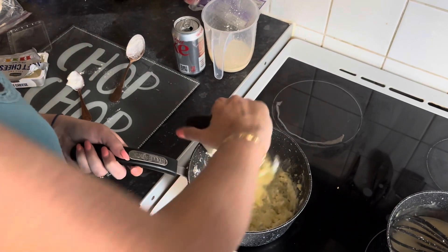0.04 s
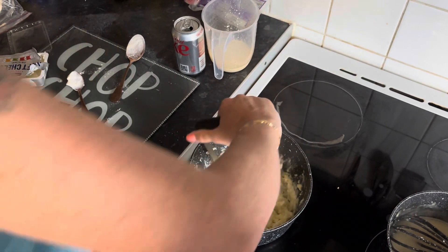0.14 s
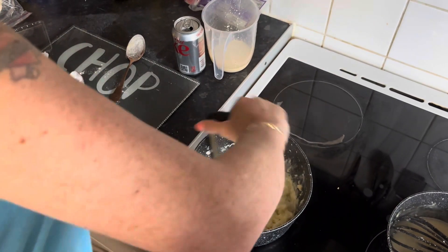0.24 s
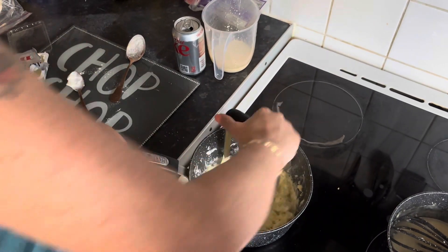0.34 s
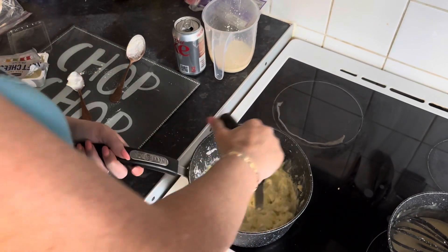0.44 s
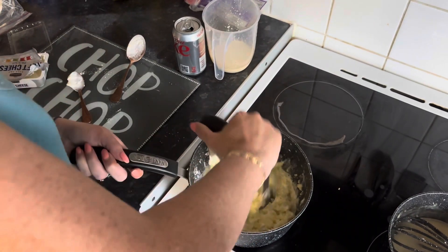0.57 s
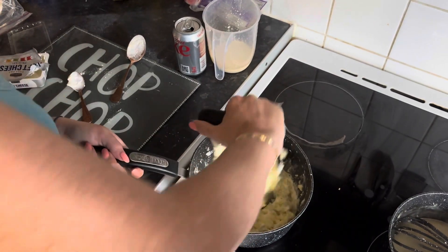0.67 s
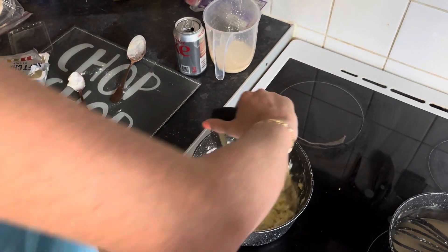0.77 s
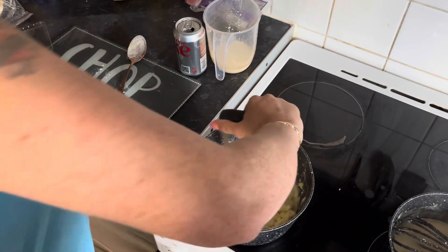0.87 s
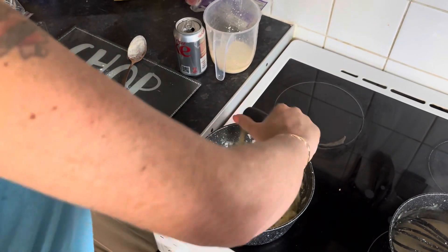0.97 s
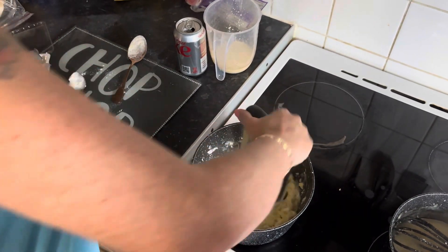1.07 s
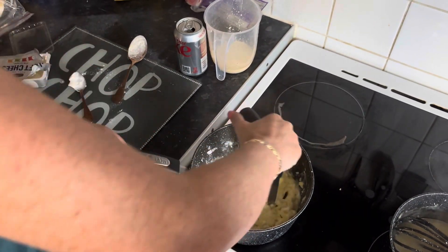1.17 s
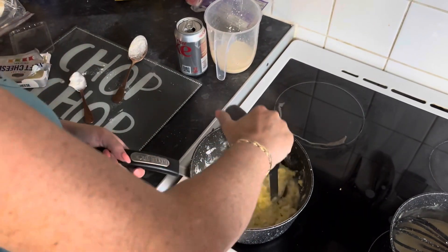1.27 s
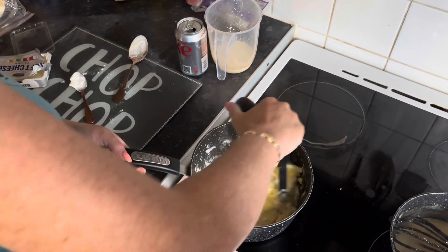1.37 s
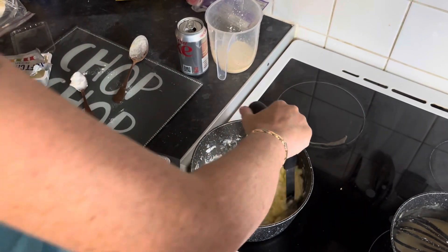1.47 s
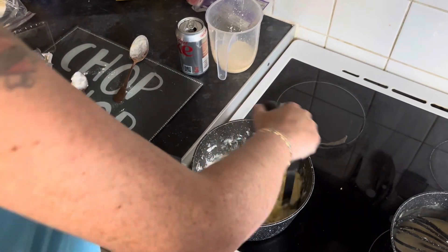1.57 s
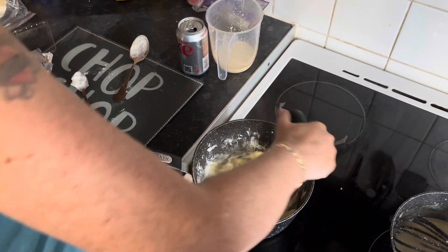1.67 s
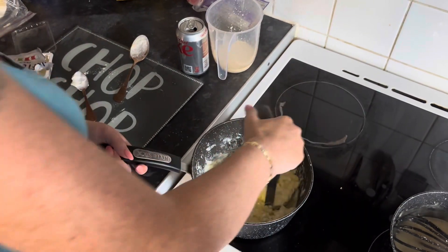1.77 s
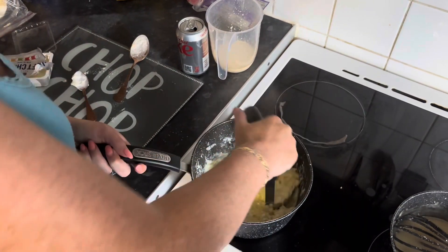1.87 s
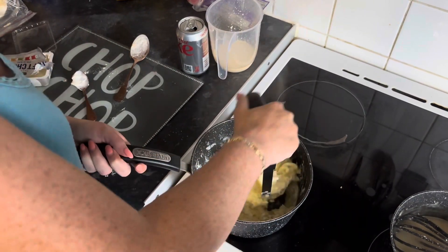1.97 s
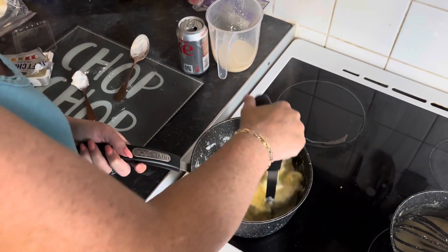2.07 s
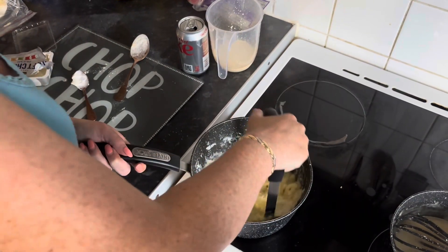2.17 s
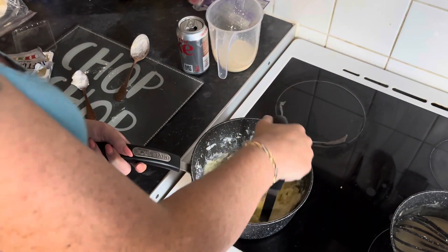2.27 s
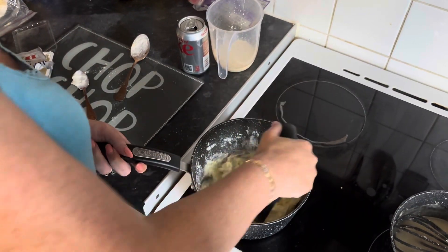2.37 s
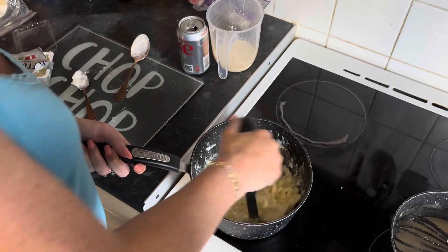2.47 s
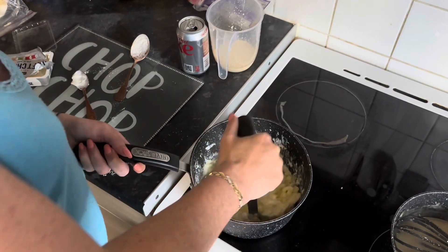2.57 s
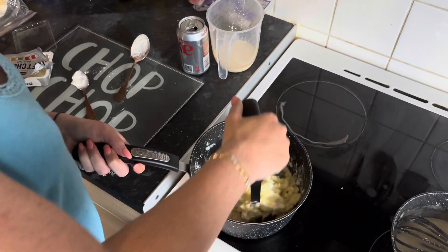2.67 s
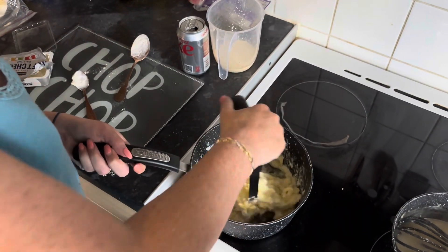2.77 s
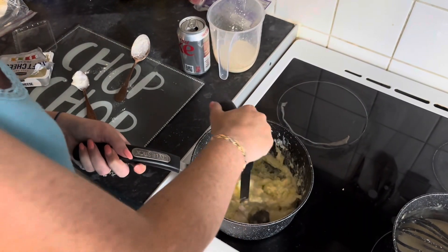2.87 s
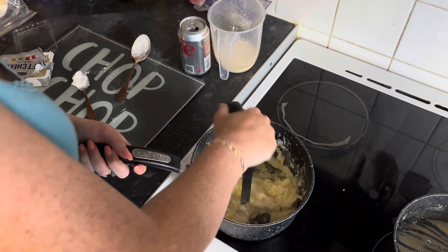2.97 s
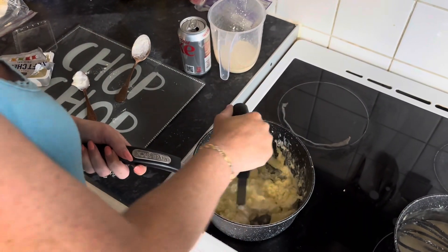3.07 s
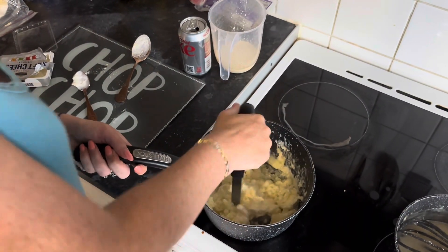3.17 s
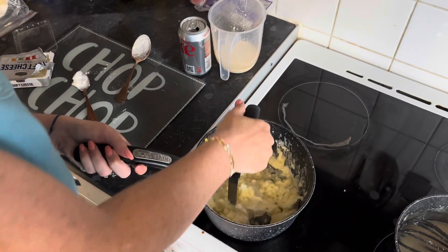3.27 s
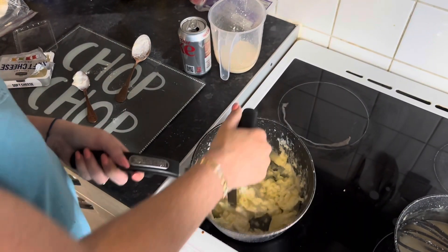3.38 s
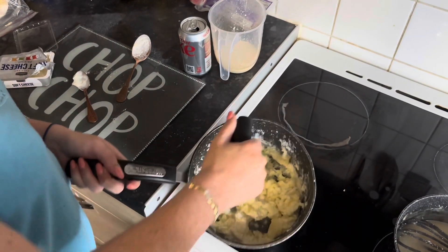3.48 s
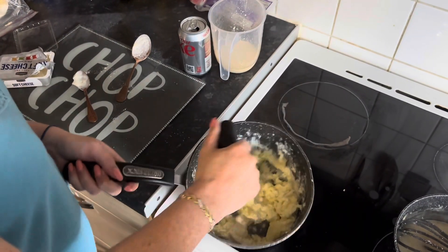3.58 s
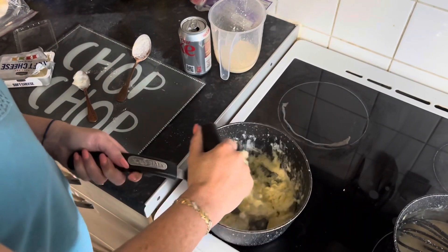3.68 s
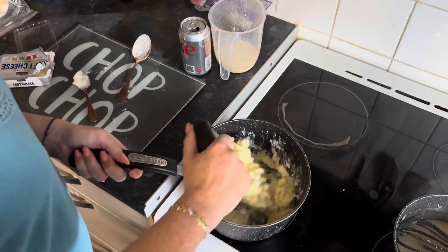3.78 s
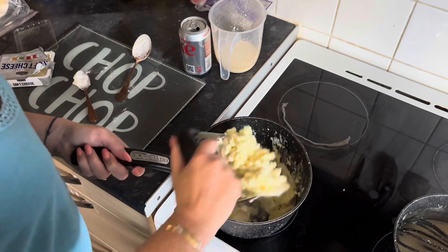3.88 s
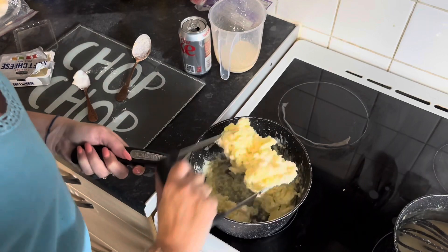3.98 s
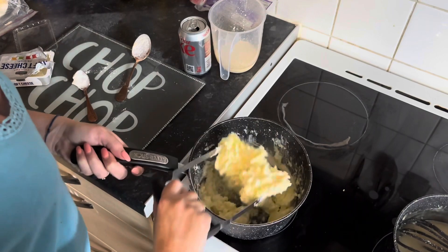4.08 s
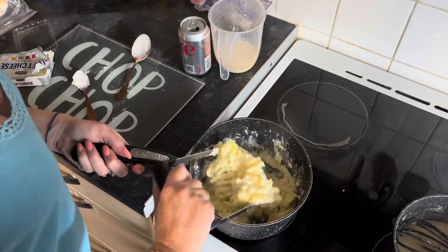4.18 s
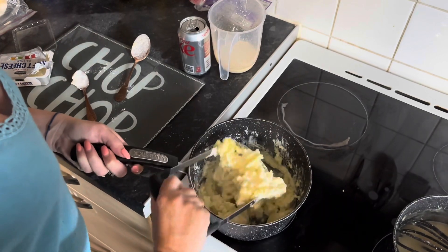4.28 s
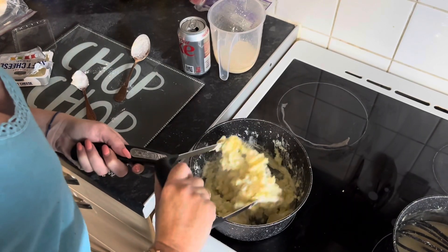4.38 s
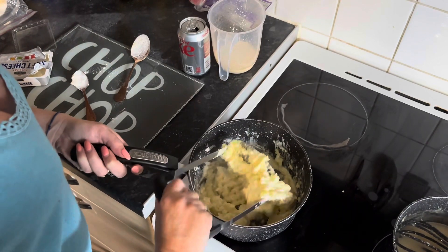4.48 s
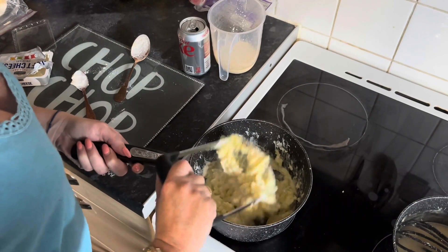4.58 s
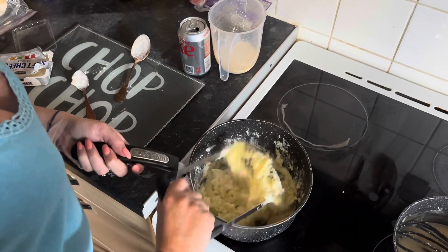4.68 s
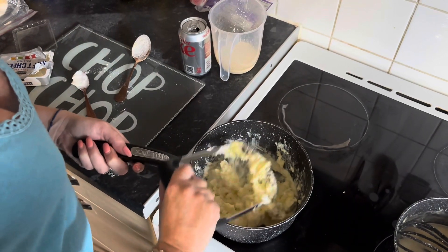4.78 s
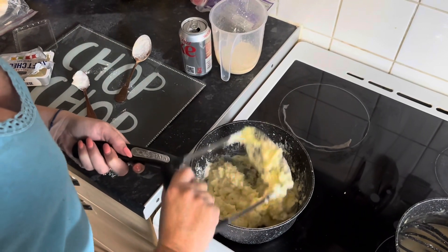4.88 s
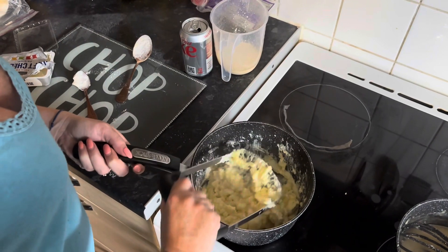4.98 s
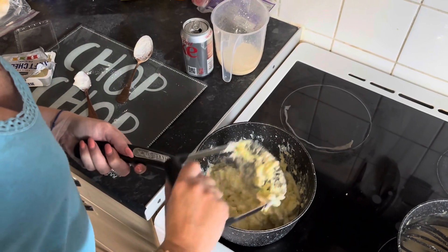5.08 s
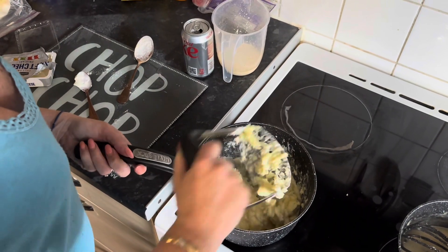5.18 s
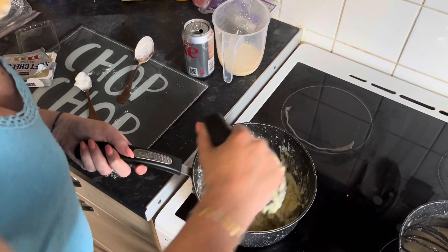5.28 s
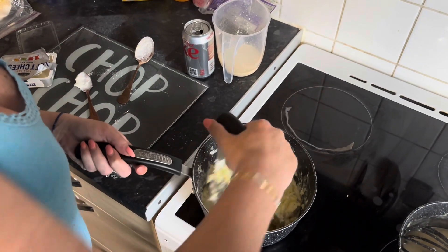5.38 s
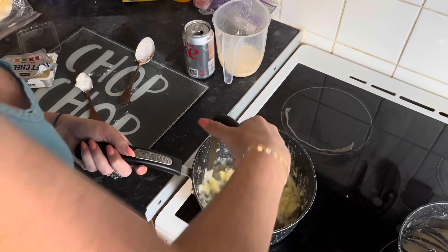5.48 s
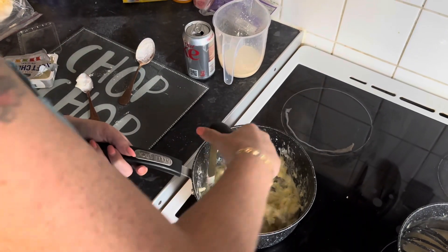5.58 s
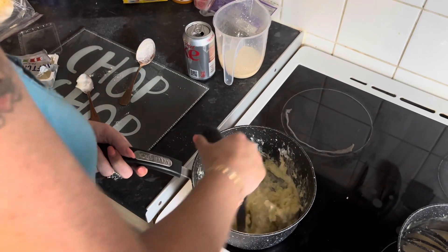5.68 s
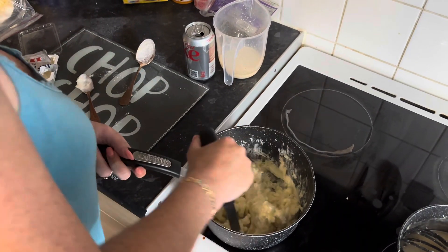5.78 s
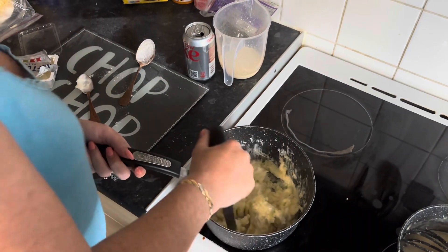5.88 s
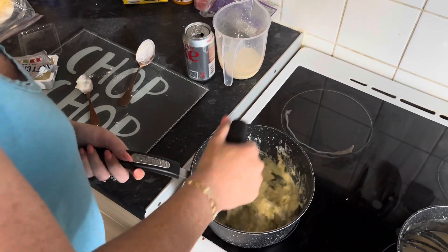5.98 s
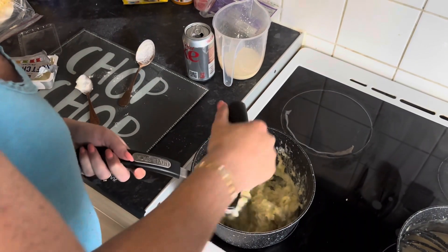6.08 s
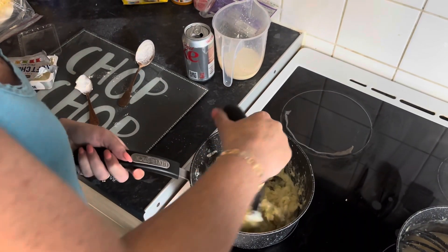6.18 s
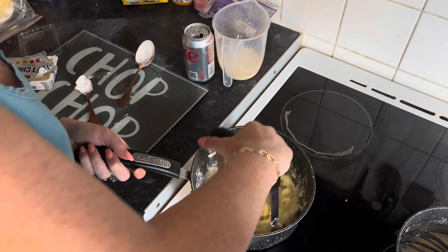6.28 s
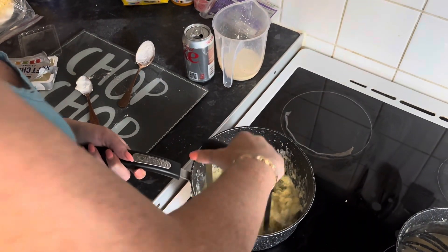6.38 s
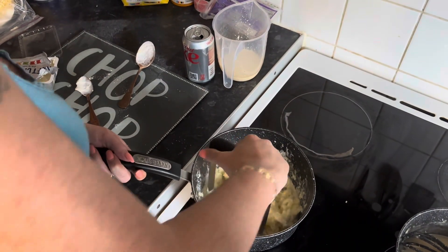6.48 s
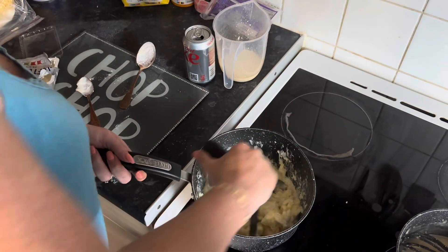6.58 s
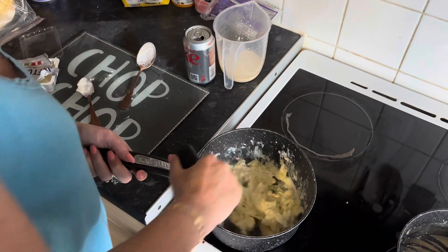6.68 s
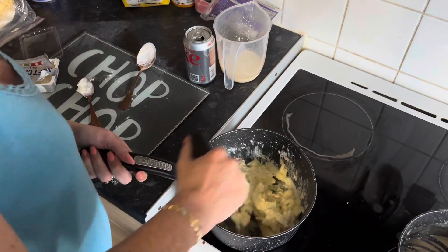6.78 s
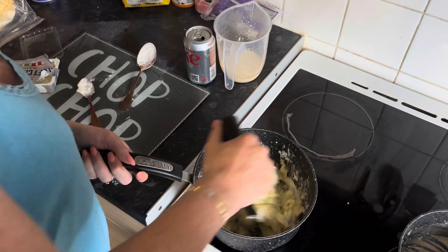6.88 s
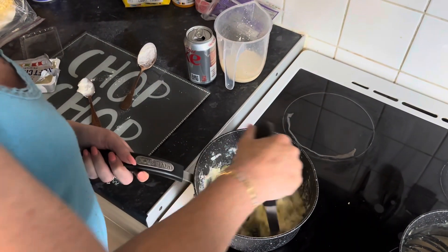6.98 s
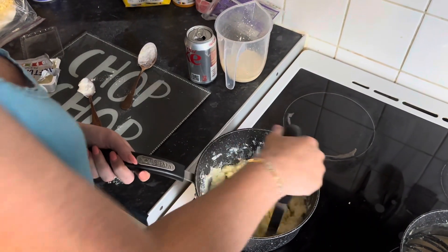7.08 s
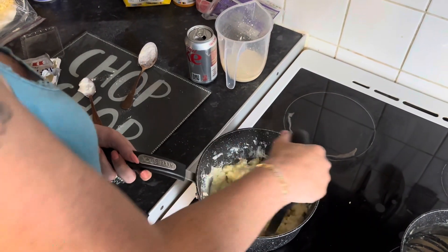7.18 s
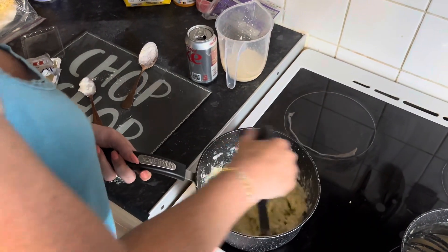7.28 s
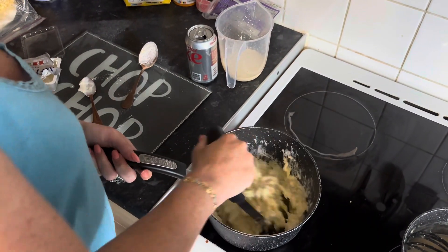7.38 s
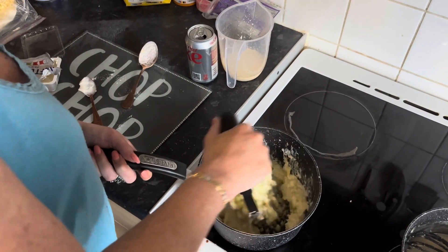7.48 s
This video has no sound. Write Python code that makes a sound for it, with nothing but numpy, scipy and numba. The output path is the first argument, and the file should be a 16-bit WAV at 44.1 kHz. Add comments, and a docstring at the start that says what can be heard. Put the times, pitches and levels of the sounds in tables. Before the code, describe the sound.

Close, uneven potato mashing: dull pan knocks, gritty metal scraping, a burst of hard rim clanks midway, then lighter squelchy working.

```python
"""Clanks, scrapes, crunches and small wet pops: a steel masher works through potatoes in a saucepan.
Place: a glass hob in a small tiled kitchen; a phone's two microphone ports hear it at an arm's length.
Blows push damped modes of pan, wires and hob, with a dull knock and a late cooker boom; gritty noise
scrapes and rubs through the same modes, broadened; air pockets ring for a few cycles.
Eight linked delays answer as tiles, over the faint shaped noise of the room's air."""
import sys
import numpy as np
from scipy import signal
from scipy.fft import rfft, irfft
from scipy.io import wavfile
from scipy.ndimage import uniform_filter1d
from numba import njit

SR = 44100
rng = np.random.default_rng(int(sys.argv[2]) if len(sys.argv) > 2 else 0)


def store_pcm(level_fs):
    """Save levels as 16-bit WAV."""
    pcm = np.round(np.clip(level_fs, -1, 1) * 32767).astype(np.int16)
    wavfile.write(sys.argv[1], SR, np.atleast_2d(pcm).T)


N = 332514  # samples

# Levels in the tables are those ahead of the microphone.
# Spectrum of the kitchen air: (frequency [Hz], relative density [dB])
AIR = [(15, -46), (25, -14), (80, 5.5), (1060, -23.5), (1880, -39.5), (6730, -42), (8370, -27),
       (10700, -33.5), (11600, -36.5), (15200, -34.5), (16500, -52)]
# Echo paths between the tiles: (delay [ms])
KITCHEN_PATHS_MS = [5.3, 9.1, 13.7, 19.9, 26.3, 33.1, 41.9, 50.3]
# Modes of the hob: (frequency [Hz], width [Hz], level [dB])
HOB_MODES = [(112.4, 16, 0), (165.4, 41, -2.5), (166.7, 19, 4.5), (215.7, 13, -12), (260, 15, 3.5),
             (366, 24, -30.5)]
# Modes of the saucepan: (frequency [Hz], width [Hz], level [dB])
PAN_MODES = [(424.6, 44, 6), (468.5, 45, 10.5), (525.8, 41.4, 6), (620, 70, 3), (736.7, 64, 3.5),
             (870, 60, 0.5), (1010, 74, 0), (1210, 139, 2), (1470, 148, 1.5), (1704, 140, 1.5),
             (1900, 230, 0), (2053, 180, -3.5), (2320, 130, -4.5), (2510, 390, -8.5)]
# Modes of the masher wires: (frequency [Hz], width [Hz], level [dB])
WIRE_MODES = [(2700, 720, -7.5), (3130, 260, 0.5), (3445, 160, 1), (3555, 98, 4), (3860, 440, -5),
              (4410, 330, 2), (5140, 690, -5), (5960, 210, -4), (6980, 1150, -12.5), (7930, 320, -2.5),
              (9450, 1020, -7), (9580, 390, -15.5), (14400, 1300, -41)]
# The pan shifts on the glass:
# (middle time [s], length [ms], hob level at the height of the move [dB rms], cooker over hob [dB])
SHUFFLES = [(0.018, 71, -41, -16.5), (.35, 200, -56.5, 5), (1.0, 200, -54.5, 8.5), (1.45, 130, -48, -10),
            (1.68, 240, -43, -2), (2.5, 130, -63, 14), (3.04, 110, -51, -3.5), (3.821, 440, -44.5, -4.5),
            (5.72, 190, -46, -1), (6.62, 230, -52.5, 8.5), (6.78, 220, -54, 5), (6.95, 245, -67.5, 21),
            (7.141, 39, -47.5, 1), (7.251, 200, -57.5, 10.5)]
# The masher works through the mash between blows:
# (time [s], wires dragging on the pan [dB rms], their hiss [dB rms], pan rubbing on the hob [dB rms])
DRAG = [(0.0, -40.5, -62, -65), (0.38, -62, -67.5, -55), (0.68, -70, -67.5, -79), (0.842, -50, -63, -57),
        (1.16, -72.5, -72.5, -56.5), (1.53, -47.5, -62, -53), (1.95, -76, -79, -60.5),
        (2.3, -63.5, -64.5, -77), (2.75, -75.5, -75.5, -68), (3.0, -59, -69, -57), (3.59, -64.5, -72, -63),
        (3.98, -69.5, -76.5, -54.5), (4.89, -57.5, -59.5, -46.5), (5.2, -72, -78, -49),
        (5.42, -71.5, -99.5, -64), (5.56, -61, -56, -52), (6.07, -70, -78, -72), (6.57, -59.5, -62.5, -57),
        (6.91, -79.5, -77, -85), (7.14, -58.5, -62.5, -57.5), (7.54, -73.5, -85.5, -76)]
# Wires sweep along the pan, levels before the swell (a sweep can start no earlier than 0 s):
# (middle time [s], length [ms], pan level [dB rms], wire hiss over pan [dB], favoured pan pitch [Hz])
STROKES = [(.06, 176, -39, -14, 546), (.08, 80, -48.5, 0.5, 600), (.2, 130, -60, 4, 1500),
           (.265, 63, -57.5, 10, 1950), (0.705, 44, -37.5, -12.5, 604), (.81, 136, -37.5, -11, 805),
           (1.079, 98, -57, -11.5, 800), (2.461, 79, -54, -2, 604), (3.53, 160, -60, -5, 2510),
           (5.432, 35, -27.5, -6.5, 1500), (5.519, 90, -35, -5, 900), (5.64, 45, -32.5, -0.5, 1220),
           (6.33, 149, -44, -5.5, 780), (6.392, 40, -53.5, 5.5, 2460), (7.12, 78, -61.5, -1.5, 2050),
           (7.269, 36, -56.5, 3.5, 1500)]
# Air pockets burst in the mash: (time [s], peak level [dB], pitch [Hz], decay [cycles])
POPS = [(0.151, -37, 3040, 3), (0.2468, -35, 2280, 2.5), (0.268, -36.5, 1830, 5.7),
        (0.398, -45.5, 7860, 10), (0.409, -43, 3250, 2.1), (0.8828, -34.5, 1820, 2.7),
        (0.9102, -31, 7550, 3.1), (0.9261, -31.5, 1580, 3.3), (0.94, -35, 1690, 3.6),
        (1.092, -44.5, 8500, 4.5), (1.1327, -39.5, 1470, 2), (1.2, -41.5, 2360, 2.4),
        (1.238, -50.5, 1820, 1.9), (1.57, -37, 7280, 5.1), (1.5824, -33.5, 2060, 4.3),
        (1.697, -51, 8220, 4), (1.715, -43, 4410, 3), (1.736, -39, 4670, 5.9), (1.8223, -32.5, 1639, 3.2),
        (1.831, -44.5, 5500, 3), (1.897, -51, 5600, 2.7), (1.915, -52, 4980, 2.7), (2.0196, -59, 8380, 5),
        (2.1194, -51.5, 4370, 3.3), (2.1536, -42, 1220, 2.6), (2.1723, -48.5, 3500, 2.2),
        (2.2107, -43.5, 1410, 2.5), (2.3484, -52, 6050, 0.96), (2.4217, -45, 6500, 3),
        (2.4659, -35.5, 1530, 1.2), (2.499, -38.5, 1900, 1.9), (3.2744, -45, 4700, 1.2),
        (3.467, -47.5, 2680, 3), (3.5284, -41, 2860, 4.3), (5.7054, -32.5, 1220, 1.4),
        (5.8656, -40.5, 2760, 1.9), (6.38, -33, 3650, 3.4), (6.6104, -44, 1707, 3.3),
        (6.963, -40.5, 1620, 2), (7.0737, -39, 4550, 2), (7.1004, -39.5, 1970, 4.7),
        (7.1214, -39, 1640, 2.3), (7.1665, -48, 3570, 2), (7.1909, -47, 1660, 3.7), (7.2308, -48, 6000, 3),
        (7.2504, -40, 7000, 4.5), (7.264, -39, 4360, 1.9), (7.285, -44, 1680, 4.4),
        (7.3595, -50.5, 4000, 1.8), (7.3946, -44, 3450, 1.8)]
# Masher meets pan, levels before the left/right split; the hob thud is then lifted by HOB_LIFT_DB:
# (time [s], pan ring peak [dB], hob thud over pan [dB], wire clank over pan [dB], rattle decay [ms],
#  favoured pan pitch [Hz], left minus right [dB], dull knock over pan [dB], favoured wire pitch [Hz])
BLOWS = [(0.667, -26.5, -20, -19, 8, 1320, 0.5, -4, 4400),
         (0.722, -17.5, -17.5, -2, 9.7, 740, 0.5, -11.5, 4400),
         (0.954, -28.5, -6.5, -23, 4.3, 590, -1.5, -6.5, 4400),
         (1.262, -36, -14, -12, 5.3, 714, 3, -6, 4400), (1.279, -16, -9.5, -17.5, 4.3, 1110, 1, -4.5, 4400),
         (1.297, -19.5, -11, -30.5, 1.7, 414, 1, -4.5, 4400),
         (1.4229, -11.5, -30, 3.5, 3.5, 1300, -1, 7, 5610), (1.531, -25.5, -16.5, -8, 1, 694, 2, 1, 3300),
         (1.648, -39, 1, -8, 3.2, 418, -1, -6, 8050), (1.813, -44, -31, 4.5, 0.91, 1490, 0, 6.5, 4430),
         (2.2401, -34, -13, -21, 2.8, 683, -1, 2.5, 3300),
         (2.435, -41.5, -0.5, -10, 9.3, 436, -1, -5, 4430),
         (2.8498, -16, -16.5, -10, 8.6, 1199, 0, 4, 5000), (2.859, -21.5, -20, -20, 3.7, 480, 0, -2, 4600),
         (2.982, -33.5, -17, -11, 0.78, 1900, 1, -1, 3330),
         (3.628, -29.5, -20, -5.5, 11, 560, -3, -7.5, 4030),
         (3.645, -2, -9.5, -5.5, 4.4, 900, 1, -8.5, 5000), (3.72, -16.5, -19, -12, 4.1, 1110, -2, -5, 4000),
         (4.017, -11, -22, -5.5, 3.2, 486, -2, -7, 3500), (4.023, -8, -4.5, 2.5, 10, 476, 1.5, -12, 3520),
         (4.201, -23.5, -5, 2.5, 1.9, 543, 0.5, -9.5, 3500),
         (4.214, -15, -7.5, 4.5, 1.7, 420, 3, -13.5, 3540),
         (4.425, -12.5, -9.5, -1, 4.1, 606, -2, -10, 3500), (4.4361, -9.5, -6.5, 5, 5, 460, 2, -12, 3500),
         (4.447, -20, -10, 7, 3.8, 460, -0.5, -13, 3500), (4.665, -8.5, -7, 3, 9, 490, -1.5, -14, 3440),
         (4.673, -11, -11.5, 0.5, 3.3, 500, -1.5, -13.5, 3500),
         (4.911, -10, -7, 2.5, 3.4, 1470, -1, -4, 3320), (4.917, -8, -5.5, 6, 3.4, 465, 0.5, -14.5, 3300),
         (5.402, -13, -18.5, 0.5, 5.2, 1510, 3, -2, 4330), (5.614, -30.5, -24, 3.5, 4, 910, -1, -5, 6000),
         (5.631, -22, -32, -4, 7.6, 1257, -2, -13, 4470), (6.248, -14, -14, -7, 5.4, 1115, -1, -6, 4600),
         (6.487, -45, -8, -13, 6.1, 497, 3, -11, 4400),
         (6.551, -34.5, -1.5, -11.5, 8.8, 530, 0.5, -3.5, 4340),
         (6.655, -23.5, -10, -1, 7.6, 1233, 2, -12, 4600),
         (6.683, -21.5, -9, 2.5, 4.7, 1470, 1.5, -5.5, 4700),
         (6.981, -22.5, -12.5, -5.5, 2.9, 983, 0.5, -3, 5960)]

AIR_DB = -65  # rms
KITCHEN_T60_S, KITCHEN_DAMP, KITCHEN_DB, KITCHEN_WIDE = 0.22, 0.08, -8, 0.89
COOKER_HZ, COOKER_WIDTH_HZ = 77.26, 46
COOKER_BOOM_DB, COOKER_BOOM_MS = -17, 31  # under the hob thud before its lift; time to swell
# Parts shudder on after a blow: (level relative to the blow's peak [dB], rise [ms], t60 [s])
PAN_SHUDDER, WIRE_SHUDDER = (-30.5, 36, 0.54), (-34.5, 35, 0.19)
HOB_SHUDDER, COOKER_SHUDDER = (-11, 51, 0.34), (-28.5, 47, 1)  # relative to the hob thud before its lift
FAINT_POPS_PER_S, FAINT_POP_HZ = 14, 3000  # pitch scatters an octave either way
FAINT_POP_DB, FAINT_POP_SPREAD_DB = 5, 3  # least level over the drag; mean random excess
CONTACT_MS = 0.8  # time the masher takes to bear down
HOB_LIFT_DB = 1.5
SPLAT_DB, SPLAT_MS = -6, 15.9  # mash under a blow: level relative to the pan ring, decay
KNOCK_WIDTH, KNOCK_CYCLES = 0.32, 4.47  # width as a share of pitch; swings before it is damped
MIC_LOW_HZ, MIC_TOP_HZ = 53.4, 16600
MIC_DIP_HZ, MIC_DIP_WIDTH_HZ = 11830, 1400


def undb(db):
    """Decibels to gain."""
    return 10 ** (np.asarray(db) / 20)


def peak(x, db):
    """Scales to a peak level."""
    return x * undb(db) / np.abs(x).max()


def rms(x, db):
    """Scales to a root-mean-square level."""
    return x * undb(db) / np.sqrt(np.mean(x ** 2))


def ears(left_minus_right_db):
    """Left and right gains of a place."""
    return undb(np.array([[left_minus_right_db], [-left_minus_right_db]]) / 2)


def add(out, s, sound):
    """Mixes a short sound in at s seconds."""
    i = int(s * SR)
    out[:, i:i + sound.shape[1]] += sound[:, :N - i]


@njit
def ring(push, poles, gains):
    """Damped modes pushed by one force; each ear hears every mode with its own complex gain."""
    out = np.zeros((2, len(push)))
    for m in range(len(poles)):
        z = 0j
        for i in range(len(push)):
            z = z * poles[m] + push[i]
            out[0, i] += (gains[0, m] * z).imag
            out[1, i] += (gains[1, m] * z).imag
    return out


def body(push, modes, scatter_db, detune, wide_hz=900.):
    """Rings scattered modes of a solid body; high modes reach the two ports further out of step."""
    hz, width, db = np.array(modes, float).T
    pitch_chance, level_chance, lead_chance = rng.standard_normal((len(hz), 3)).T
    swing = 2j * np.pi * hz * (1 + detune * pitch_chance)
    poles = np.exp((swing - np.pi * width) / SR)
    lead = np.minimum(hz / wide_hz, 1) * 0.23 * lead_chance  # radians
    sign = (-1.) ** np.arange(len(hz))  # neighbours swing against each other, so little leaks below them
    level = sign * width * undb(db + scatter_db * level_chance)
    gains = level * np.exp(1j * np.array([lead, -lead]))
    return ring(push + 1e-18, poles, gains)  # the tiny offset keeps the decay out of denormal numbers


def favour(spot_hz, modes=PAN_MODES, slope_db=4.0):
    """The spot touched favours modes near one pitch; others lose slope_db per octave away."""
    return [(hz, width, db - slope_db * abs(np.log2(hz / spot_hz))) for hz, width, db in modes]


def broad(modes):
    """Damping by the mash or by rubbing contact: the same modes, three times as wide."""
    return [(hz, width * 3, db) for hz, width, db in modes]


def gritty(rate, spread_db, size=N):
    """Stick and slip: noise that jumps to a new strength at uneven moments, rate times a second."""
    slip = np.cumsum(rng.random(size) < rate / SR)
    strength = undb(spread_db * rng.standard_normal(size + 1))[slip]
    return rng.standard_normal(size) * uniform_filter1d(strength, size=30)


def air():
    """Still air of the kitchen: shaped noise, nearly the same left and right in the bass."""
    hz = np.maximum(np.arange(N // 2 + 1) * SR / N, 1)
    table_hz, table_db = np.array(AIR).T
    shape = undb(np.interp(np.log(hz), np.log(table_hz), table_db))
    mid, side = rfft(rng.standard_normal((2, N))) * shape
    side = side * np.minimum(hz / 3200.0, .8)
    return rms(irfft(np.array([mid + side, mid - side]), N), AIR_DB)


@njit
def walls(x, lags, gain, damp):
    """Eight delay lines that feed each other, duller on every round."""
    line, soft, out = np.zeros((8, 4096)), np.zeros(8), np.zeros((2, len(x)))
    for i in range(len(x)):
        total = 0.
        for k in range(8):
            soft[k] += (1 - damp) * (gain[k] * line[k, (i - lags[k]) & 4095] - soft[k])
            total += soft[k]
            out[k % 2, i] += soft[k]
        for k in range(8):
            line[k, i & 4095] = x[i] + soft[k] - total / 4
    return out


def kitchen(near):
    """Tiles return the sound over eight paths, spread left and right."""
    lags = (np.array(KITCHEN_PATHS_MS) * SR / 1000).astype(np.int64)
    path_gain = undb(-60 * lags / SR / KITCHEN_T60_S)
    tiles = walls(near.mean(axis=0), lags, path_gain, KITCHEN_DAMP)
    # the ports sit close together: echoes differ between them only above the bass
    high = signal.butter(2, 350., "high", fs=SR, output="sos")
    side = signal.sosfilt(high, tiles[0] - tiles[1]) / 2
    return undb(KITCHEN_DB) * (tiles.mean(axis=0) + KITCHEN_WIDE * np.array([side, -side]))


def shifts():
    """Power of hob and cooker while the pan shifts: each move swells and fades."""
    t, hob, cooker = np.arange(N) / SR, np.zeros(N), np.zeros(N)
    for s, length_ms, hob_db, cooker_db in SHUFFLES:
        swell = np.cos(np.pi * np.clip((t - s) * 1000 / length_ms, -.5, .5)) ** 2
        hob += swell * undb(2 * hob_db)
        cooker += swell * undb(2 * (hob_db + cooker_db))
    return hob, cooker


def shudder(peaks_db, rule):
    """Every blow leaves a tremor that rises quickly and dies away; power at every sample."""
    under_db, rise_ms, t60_s = rule
    t, power = np.arange(N) / SR, np.zeros(N)
    for blow, db in zip(BLOWS, peaks_db):
        since = t[:N - int(blow[0] * SR)]
        rise = 1 - np.exp(-since * 1000 / rise_ms)
        power[N - len(since):] += (undb(db + under_db - 60 * since / t60_s) * rise) ** 2
    return power


def curve(column):
    """One column of the drag table at every sample."""
    table = np.array(DRAG)
    return np.interp(np.arange(N) / SR, table[:, 0], table[:, column])


def drag():
    """Friction and the tremor after each blow keep pan, wires, hob and cooker sounding."""
    _, ring_db, thud_db, clank_db = np.array(BLOWS)[:, :4].T
    hob_shift, cooker_shift = shifts()
    rub_power = undb(2 * curve(column=3))
    pan_power = undb(2 * curve(column=1)) + shudder(ring_db, PAN_SHUDDER)
    wire_power = undb(2 * curve(column=2)) + shudder(ring_db + clank_db, WIRE_SHUDDER)
    hob_power = rub_power + shudder(ring_db + thud_db, HOB_SHUDDER) + hob_shift
    cooker_power = rub_power + shudder(ring_db + thud_db, COOKER_SHUDDER) + cooker_shift
    # steady sounds at 0 dB, then shaped by their power
    pan = rms(body(gritty(150, 4.1), broad(PAN_MODES), 0, 0), 0) * np.sqrt(pan_power)
    wires = rms(body(gritty(250, 5.0), broad(WIRE_MODES), 0, 0), 0) * np.sqrt(wire_power)
    hob = rms(body(gritty(30, 4.1), broad(HOB_MODES), 0, 0), 0) * np.sqrt(hob_power)
    cooker_mode = [(COOKER_HZ, COOKER_WIDTH_HZ, 0)]
    cooker = rms(body(rng.standard_normal(N), cooker_mode, 0, 0), 0) * np.sqrt(cooker_power)
    return pan + wires + hob + cooker


def faint_pops():
    """Small pockets burst at random, louder while the masher drags harder; rows as in POPS."""
    when, size, pitch, cycles = rng.random((int(FAINT_POPS_PER_S * N / SR), 4)).T
    drag_db = curve(column=1)[(when * N).astype(int)]
    db = drag_db + FAINT_POP_DB - FAINT_POP_SPREAD_DB * np.log(1 - size)
    hz = FAINT_POP_HZ * 2 ** (2 * pitch - 1)
    return list(zip(when * N / SR, db, hz, 1 + 3 * cycles))


def pops():
    """Each pocket rings a few cycles, gliding up, and spits a little around its pitch."""
    out, t = np.zeros((2, N)), np.arange(SR // 20) / SR
    for s, db, hz, cycles in POPS + faint_pops():
        turns = t * hz
        ping = np.sin(2 * np.pi * turns * (1 + 0.011 * turns)) * np.exp(-turns / cycles)
        spit = signal.lfilter(*signal.iirpeak(hz, 0.8, SR), rng.standard_normal((2, len(t))))
        burst = ping + 0.6 * spit * np.exp(-t / 0.011)
        add(out, s, peak(burst, db) * ears(0.89))
    return out


def strokes():
    """Each sweep swells and fades, gritty, in the colours of pan and wires."""
    out, ms = np.zeros((2, N)), np.arange(SR // 3) / SR * 1000
    for s, length_ms, pan_db, wire_db, spot_hz in STROKES:
        rub = gritty(500, 3.8, size=len(ms))
        pan = rms(body(rub, broad(favour(spot_hz)), 0, 0), pan_db)
        wires = rms(body(rub, favour(4500., WIRE_MODES, 3.4), 0, 0), pan_db + wire_db)
        swell = np.sin(np.pi * np.minimum(ms / length_ms, 1))
        add(out, max(s - length_ms / 2000, 0), (pan + wires) * swell)
    return out


def blows():
    """A short uneven rattle rings pan and wires; the hob feels a softer push and the cooker booms late."""
    out, ms = np.zeros((2, N)), np.arange(SR // 4) / SR * 1000
    shove = np.gradient(ms * np.exp(-ms / 0.91))
    boom = ms * np.exp(-ms / COOKER_BOOM_MS) * np.sin(2 * np.pi * COOKER_HZ * ms / 1000)
    for s, pan_db, hob_db, wire_db, rattle_ms, spot_hz, side_db, knock_db, wire_hz in BLOWS:
        # the wires touch one by one: a new strength every 32 samples
        chatter = np.repeat(undb(3.5 * rng.standard_normal(len(ms) // 32 + 1)), 32)[:len(ms)]
        swell = (1 - np.exp(-(ms + 0.05) / CONTACT_MS)) * np.exp(-ms / rattle_ms)
        rattle = rng.standard_normal(len(ms)) * chatter * swell
        # the first contact is one clean tick that wakes all pan modes alike
        at_contact = np.arange(len(ms)) == int(CONTACT_MS * SR / 1000)
        tick = np.sqrt(np.sum(rattle ** 2)) * 1.52 * at_contact
        sound = peak(body(rattle + tick, favour(spot_hz), 1.5, .01), pan_db)

        # the mash squashed under the blow adds a blurred crunch in the damped pan
        squash = (1 - np.exp(-ms / 3.8)) * np.exp(-ms / SPLAT_MS)
        crunch = rng.standard_normal(len(ms)) * chatter * squash
        sound += peak(body(crunch, broad(favour(spot_hz)), 2.4, 0.036), pan_db + SPLAT_DB)

        # dull knock at the touched spot: a few swings and a wide resonance
        swings = np.minimum(ms * spot_hz / 1000, KNOCK_CYCLES)
        knock = np.sin(2 * np.pi * swings) * np.sin(np.pi * swings / KNOCK_CYCLES) ** 2
        knock = knock + peak(body(rattle, [(spot_hz, KNOCK_WIDTH * spot_hz, 0)], 0, 0), -3.5)
        sound += peak(knock, pan_db + knock_db)

        wire_modes = favour(wire_hz, WIRE_MODES, 3.2)
        sound += peak(body(rattle + 0.29 * tick, wire_modes, 0.99, 0.0048), pan_db + wire_db)
        sound += peak(body(shove, HOB_MODES, 4, 0.0052), pan_db + hob_db + HOB_LIFT_DB)
        sound += peak(boom, pan_db + hob_db + COOKER_BOOM_DB)
        add(out, s, sound * ears(side_db))
    return out


def scene():
    """The work at the pan, its echo off the tiles, and the air."""
    near = drag() + pops() + strokes() + blows()
    return near + kitchen(near) + air()


def record(dry):
    """The microphone drops the deep bass and dips in the treble; peaks are rounded and the top is cut."""
    b, a = signal.iirnotch(MIC_DIP_HZ, MIC_DIP_HZ / MIC_DIP_WIDTH_HZ, SR)
    heard = signal.lfilter(b, a, signal.lfilter(b, a, dry))  # the dip applies twice
    heard = signal.sosfilt(signal.butter(2, MIC_LOW_HZ, "high", fs=SR, output="sos"), heard)
    rounded = np.tanh(1.399 * heard) / 1.167
    return signal.sosfilt(signal.ellip(10, .2, 80, MIC_TOP_HZ, fs=SR, output="sos"), rounded)


dry = scene()
out = record(dry)
store_pcm(out)
```